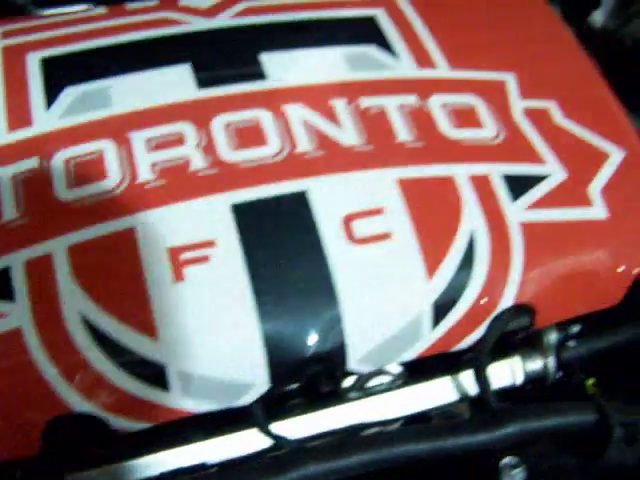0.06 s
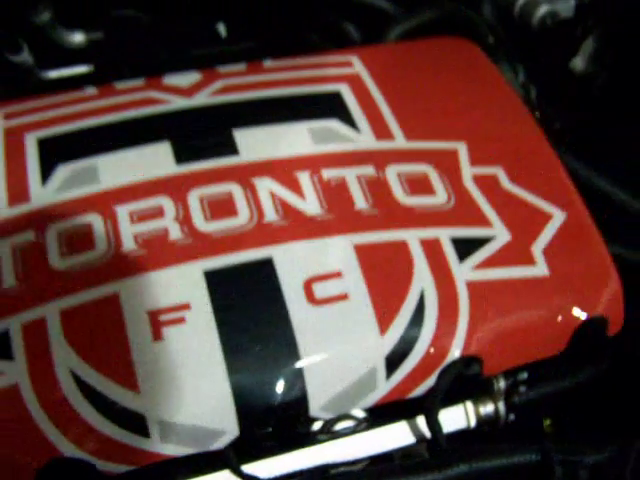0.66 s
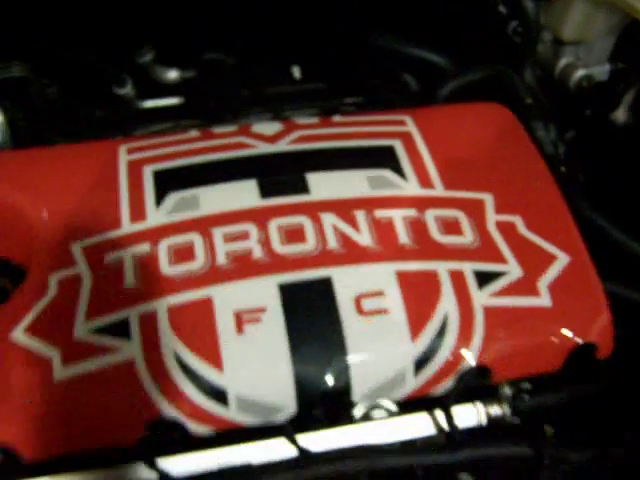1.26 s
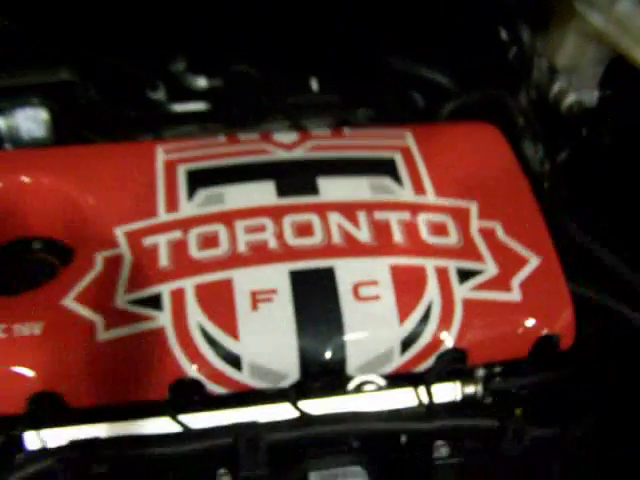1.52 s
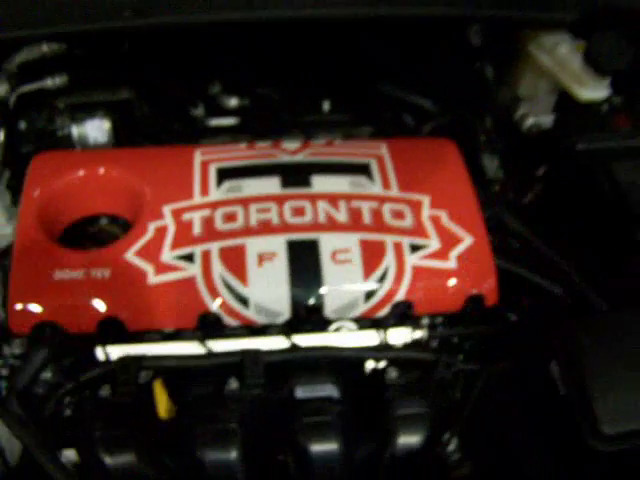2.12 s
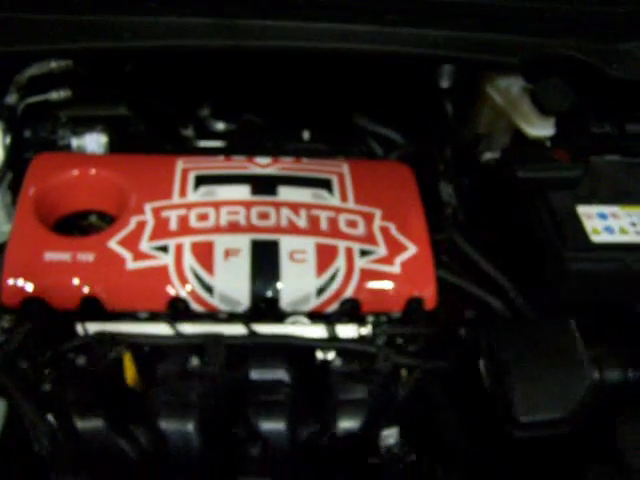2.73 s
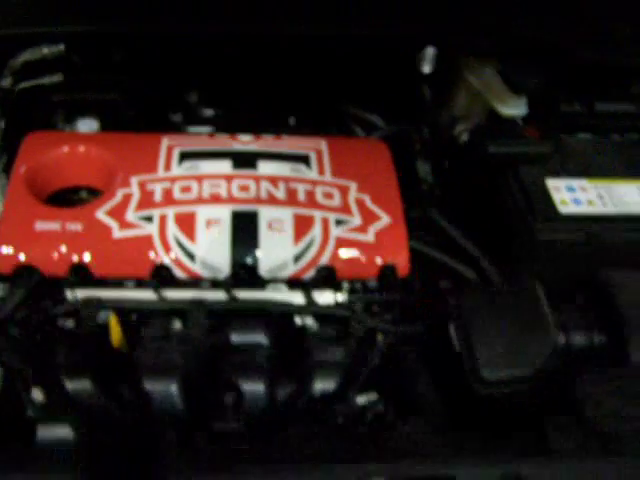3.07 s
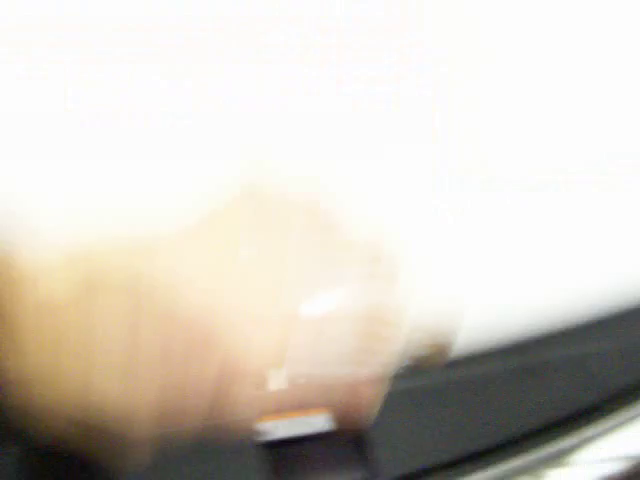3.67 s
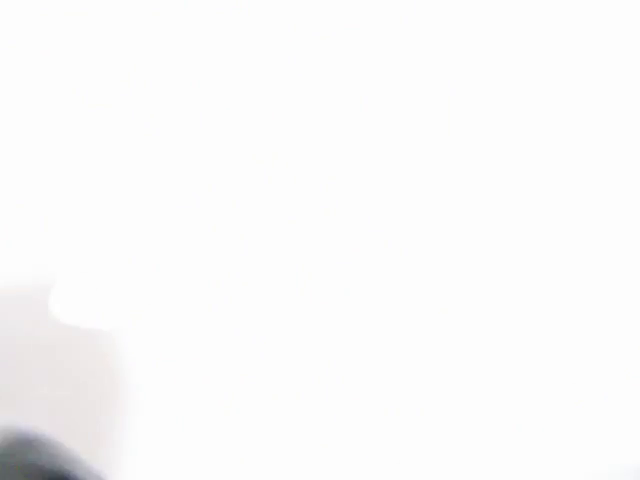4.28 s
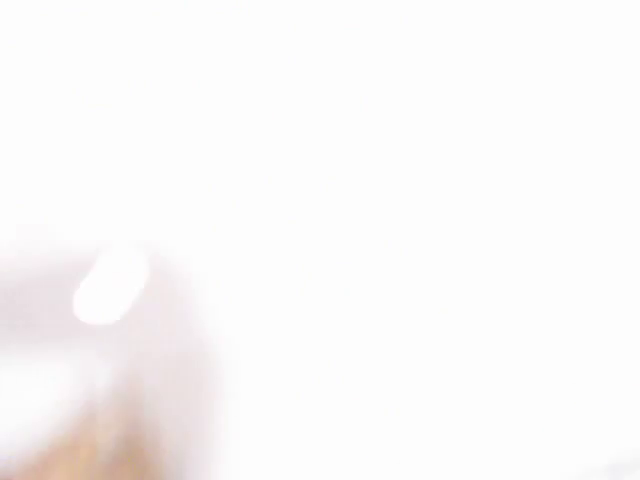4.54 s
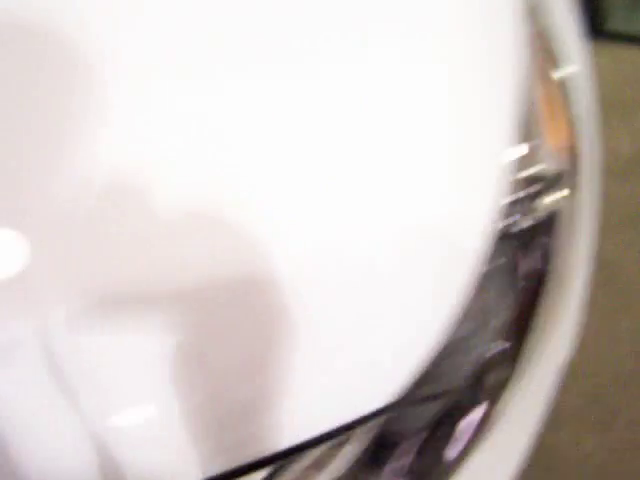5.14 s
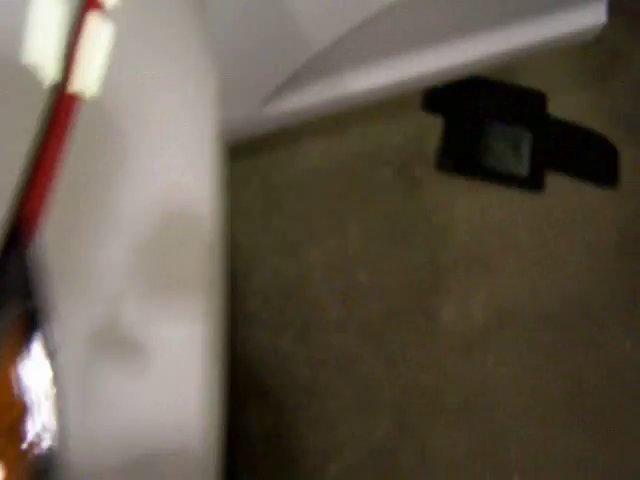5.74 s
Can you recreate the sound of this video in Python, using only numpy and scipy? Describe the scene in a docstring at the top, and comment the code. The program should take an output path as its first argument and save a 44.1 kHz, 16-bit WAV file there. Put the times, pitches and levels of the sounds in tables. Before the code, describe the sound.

A car engine idles in a garage with a low drone, a rush of fan and belts, and a faint lamp buzz. A sleeve rustles and the prop rod clicks. The hood drops with a loud, rattling steel bang, then is pushed shut with a second boom and a latch snap. The room rings while the idle carries on, heard through a close, slightly dull microphone that overloads on both bangs.

```python
"""Garage, lamps buzzing, car idling: engine drone and rumble, rush of fan and belts.
A sleeve rustles and the prop rod clicks as the hood is lowered. The hood drops onto its catch and
rattles, steel clacking and panel booming; it is pushed shut, the latch snaps, the garage rings on.
A small microphone moves from over the engine to beside the wing; it is dull above 8 kHz and
overloads on both bangs."""
import sys
import numpy as np
from scipy import signal
from scipy.fft import rfft, irfft, next_fast_len
from scipy.io import wavfile
from scipy.ndimage import map_coordinates

SR = 44100
rng = np.random.default_rng(int(sys.argv[2]) if len(sys.argv) > 2 else 0)


def wav_record(signal):
    """Record a signal, one row per channel, as 16-bit PCM in the file named by sys.argv[1]."""
    frames = np.transpose(np.atleast_2d(signal))
    bounded = np.clip(frames, -1, 1)
    # unit amplitude maps onto the largest positive 16-bit level
    quanta = np.round(bounded * 32767).astype(np.int16)
    wavfile.write(sys.argv[1], SR, quanta)


N = 257103


def hood():
    """Each contact clacks and booms; further back it is duller, longer, wetter and pings less."""
    # t/s, clack/dB, boom/dB, boom centre/Hz, depth (0 front edge, 1 hinges)
    contacts = [(3.9902, -3, -4.5, 306, 0.2), (4.014, -11.5, -17.5, 200, 0.44),
                (4.022, -15, -11, 321, 0.42), (4.070, -15.5, -11.5, 105, .05),
                (4.096, -18, -9.5, 139, 0.47), (4.154, -13, -12, 140, 0.6), (4.2878, -21, -13, 134, 0.85),
                (4.389, -25.5, -20.5, 106, 0.87), (4.779, -6.5, -8, 500, 0.16),
                (4.785, -23.5, -4.5, 197, .2), (4.876, -29, -13, 85, .05)]
    t = np.arange(SR * 3 // 4) / SR
    events = []
    for s, clack_db, boom_db, boom_hz, depth in contacts:
        clack_hz = 4300 / 2 ** (1.88 * depth)
        ping_db = -18 + 9 * np.log2(clack_hz / 3000)
        steel = clack(t, clack_hz, t60_s=0.042 * 3.85 ** depth, ping_db=ping_db)
        echo_db = -7 + 14.5 * depth
        events.append((s, amp(clack_db) * steel + amp(boom_db) * boom(t, boom_hz), echo_db))
    return in_garage(events)


def clack(t, centre_hz, t60_s, ping_db):
    """Steel strikes steel; the latch spring pings."""
    steel_spectrum = [(100, -8), (400, 4), (800, -4), (1300, -4.5), (2000, -7), (2800, -5.5), (3500, -1),
                      (4200, -6), (5000, -12.5), (7000, -17.5), (10000, -28)]  # f/Hz, relative density/dB
    spring_modes = [(2620, -14.5, 0.27), (3465, -13.5, 0.48), (3380, -13, 0.23), (3880, -18, 0.15)]  # f/Hz, relative level/dB, t60/s
    crack = unit(filtered(noise(steel_spectrum, len(t)), lambda hz: hump(hz, centre_hz, 1.83)))
    ping = amp(ping_db) * ring(spring_modes, t)
    attack = 1 - np.exp(-t / 0.00043)
    return (crack * amp(-60 * t / t60_s) + ping) * attack


def boom(t, centre_hz):
    """Panel modes near centre_hz, detuned as the sheet flexes; weaker ones blur into a shudder."""
    panel_modes = [(63.5, -11.5, 0.76), (84.6, -1.5, 0.47), (108, -0.5, 0.18), (131, -7, 0.25),
                   (173.3, -0.5, .11), (216, -2.5, 0.092), (254.4, -2.5, .16), (291.7, 1, 0.1),
                   (338.4, -2, 0.13), (402.4, -6, 0.12), (475, -4.5, 0.096), (582, 3.5, 0.034),
                   (661, 2, 0.038), (809, 1, 0.12), (930, -4, 0.11), (1274, -9.5, 0.082)]  # f/Hz, relative level/dB, t60/s
    modes = np.zeros(len(t))
    for hz, db, t60_s in panel_modes:
        flexed_hz = hz * (1 + rng.normal(0, 0.023))
        modes += hump(hz, centre_hz, 0.56) * ring([(flexed_hz, db, t60_s)], t)
    modes /= np.sqrt(np.mean(modes[:SR // 50] ** 2))  # rms 1 over the first 20 ms
    blur = filtered(rng.standard_normal(len(t)), lambda hz: hump(hz, centre_hz, 0.83) ** 2)
    shudder = unit(blur) * amp(-60 * t / 0.11)
    rise_cycles = 0.3
    attack = 1 - np.exp(-t * centre_hz / rise_cycles)
    return (amp(-6) * modes + amp(-7.5) * shudder) * attack


def closing():
    """The shut engine bay rumbles in its resonances, then the latch snaps home."""
    bay_resonances = [(38, 0.33, -5), (73.7, 0.39, 0), (117, .25, -3.5), (247, 0.22, -2)]  # f/Hz, width/octaves, relative level/dB
    shut_s, snap_s, bay_t60_s = 4.79, 4.9383, 1.1
    t = np.arange(SR) / SR
    air = unit(filtered(rng.standard_normal(len(t)), lambda hz: resonant(hz, bay_resonances)))
    rumble = air * amp(-19 - 60 * t / bay_t60_s)
    snap = amp(-11) * clack(t, centre_hz=5500, t60_s=0.062, ping_db=-6)
    return in_garage([(shut_s, rumble, -12), (snap_s, snap, -1.5)])


def gust():
    """Air squeezed from under the hood: a soft pressure swing at the microphone."""
    puffs = [(4.791, .026, 62, -18)]  # t/s, sigma/s, f/Hz, level/dB
    t = np.arange(N) / SR
    return sum(amp(db) * swell(s, sigma_s) * np.sin(2 * np.pi * hz * (t - s))
               for s, sigma_s, hz, db in puffs)


def handling():
    """The prop rod knocks as it is stowed; hand and latch click."""
    rod_knocks = [(3.163, -14.5, 0.04), (3.2746, -18, 0.006)]  # t/s, peak/dB, t60/s
    rod_resonances = [(307, 0.2, 10.5), (1937, 0.27, -1), (4100, 0.6, -7.5)]  # f/Hz, width/octaves, relative level/dB
    small_clicks = [(2.2328, -19.5, 3970, .005), (3.304, -8.5, 3420, 0.0062), (3.983, -16, 2900, .015),
                    (4.732, -21, 2930, 0.037), (4.751, -12.5, 3450, .05), (5.365, -19.5, 720, 0.048)]  # t/s, peak/dB, f/Hz, t60/s
    echo_db = -9.5
    events = [(s, click(rod_resonances, db, t60_s), echo_db) for s, db, t60_s in rod_knocks]
    for s, db, hz, t60_s in small_clicks:
        width_octaves = 0.41 * np.sqrt(3500 / hz)
        events.append((s, click([(hz, width_octaves, 0)], db, t60_s), echo_db))
    return in_garage(events)


def click(resonances, peak_db, t60_s):
    """A short burst through a small body's resonances."""
    t = np.arange(SR // 8) / SR
    grain = filtered(rng.standard_normal(len(t)), lambda hz: resonant(hz, resonances))
    burst = grain * amp(-60 * t / t60_s) * (1 - np.exp(-t / 0.0004))
    return amp(peak_db) * burst / abs(burst).max()


def sleeve():
    """Cloth slides in strokes made of small catches, over a faint hiss."""
    strokes = [(3.063, 0.41, -39.5), (3.532, 0.2, -32.5), (3.958, .015, -34), (4.3, 0.46, -37),
               (5.03, 0.06, -36), (5.214, 0.042, -33), (5.402, 0.12, -34.5), (5.706, 0.094, -38)]  # t/s, sigma/s, level/dB
    cloth_spectrum = [(300, -9.5), (1000, -16.5), (2000, -12.5), (3000, -7), (3800, -3), (4600, -9.5),
                      (6000, -16), (7500, -26), (10000, -22)]  # f/Hz, relative density/dB
    rest_db = -46.5
    power = amp(rest_db) ** 2 + sum((amp(db) * swell(s, sigma_s)) ** 2 for s, sigma_s, db in strokes)
    catches = amp(0.34 * wobble(25) + 1.1 * wobble(400))
    return np.sqrt(power) * catches * noise(cloth_spectrum, N)


def engine():
    """Idle drone with overtones, a rumble, and fan and belt rush throbbing with the drone."""
    orders = [(1, -38.5, -42.5, -52), (2, -46, -48.5, -43.5), (3, -59, -57, -48.5), (4, -63.5, -61.5, -58),
              (5, -78, -52.5, -62), (7, -59, -58, -65.5), (10, -61, -58.5, -60.5)]  # drone multiple, level/dB at places 0, 1, 2
    rush_levels_db = [-42, -41, -40]  # level/dB at places 0, 1, 2
    rush_spectrum = [(200, -32.5), (400, -4.5), (550, -2), (750, -4), (1070, -4), (1400, -8), (2600, -8.5),
                     (3700, -8), (4500, -18), (5400, -17.5), (6000, -31.5), (7400, -30.5), (8200, -49),
                     (10000, -57)]  # f/Hz, relative density/dB
    rumble_spectrum = [(15, -23), (30, 1), (45, -1.5), (60, 2.5), (90, 0.5), (130, 4), (175, 2.5),
                       (260, -0.5), (450, -5.5), (700, -31)]  # f/Hz, relative density/dB
    drone_hz = 75.3
    turns = np.cumsum(drone_hz * (1 + 0.0015 * wobble(4.19))) / SR
    drone = sum(at_place(levels_db) * tone(round(k) * turns, waver_db=min(0.47 * k, 2.2))
                for k, *levels_db in orders)
    throb = 1 + 0.069 * np.sin(2 * np.pi * turns)
    rush = at_place(rush_levels_db) * amp(0.88 * wobble(13)) * throb * noise(rush_spectrum, N)
    rumble = amp(-44 + 0.53 * wobble(4.8)) * noise(rumble_spectrum, N)
    return drone + rush + rumble


def lamps():
    """Lamps hum in low mains harmonics and sizzle in high ones."""
    harmonics = [(1, -55, -56.5, -50.5), (2, -45, -43.5, -46.5), (4, -62, -49, -54.5), (6, -54, -45, -52.5),
                 (80, -66, -67.5, -76)]  # mains multiple, level/dB at places 0, 1, 2
    mains_hz = 60
    t = np.arange(N) / SR
    buzz = sum(at_place(levels_db) * tone(round(k) * mains_hz * t, waver_db=0.9)
               for k, *levels_db in harmonics)
    sizzle = np.zeros(N)
    for hz in 2 * mains_hz * np.arange(38, 52):
        gain = amp(rng.normal(0, 2.8)) * hump(hz, 5300, 0.3)
        sizzle += gain * np.sin(2 * np.pi * (hz * t + rng.random()))
    return buzz + at_place([-57, -59.5, -64]) * unit(sizzle)


def whines():
    """Thin tones wavering in phase and level."""
    partials = [(801, -60.5, -56.5, -55), (914, -64, -58.5, -64), (981, -70, -55.5, -59.5),
                (1043, -58, -50, -55)]  # f/Hz, level/dB at places 0, 1, 2
    t = np.arange(N) / SR
    return sum(at_place(levels_db) * tone(hz * t + 0.078 * wobble(14), waver_db=1.5)
               for hz, *levels_db in partials)


def garage(x):
    """A fresh diffuse echo of x; the treble dies first."""
    decay_times = [(60, 2.16), (250, 1.24), (1000, 1.78), (3000, 1.92), (5000, 0.55), (8000, 0.16)]  # f/Hz, t60/s
    wall_reflection = [(50, -9.5), (300, 2), (1200, -0.5), (3000, -4.5), (5000, -11.5), (8000, -9.5)]  # f/Hz, relative level/dB
    hz, t, grains = signal.stft(rng.standard_normal(int(1.5 * SR)), SR, nperseg=512)
    fade = amp(along(wall_reflection, hz)[:, None] - 60 * t / along(decay_times, hz)[:, None])
    build_up = 1 - np.exp(-t / 0.0075)
    tail = signal.istft(grains * fade * build_up, SR, nperseg=512)[1]
    mids = abs(rfft(tail, 2 * SR))[200:6000]  # 100-3000 Hz
    return signal.fftconvolve(x, tail / np.sqrt(np.mean(mids ** 2)))


def in_garage(events):
    """Track of (t/s, sound, echo/dB) events, each with its own echo."""
    track = np.zeros(N)
    for s, sound, echo_db in events:
        add(track, s, sound)
        add(track, s, amp(echo_db) * garage(sound))
    return track


def at_place(levels_db):
    """A source's gain over time as the microphone moves through three places."""
    mic_path = [(0, 0), (1.2, 0.47), (2.5, 0.94), (4.0, 1.2), (5.2, 2)]  # t/s, place (0 over the engine, 1 in front of the car, 2 beside the wing)
    place = np.interp(np.arange(N) / SR, *np.transpose(mic_path))
    return amp(np.interp(place, np.arange(len(levels_db)), levels_db))


def amp(db):
    """dB to gain."""
    return 10 ** (np.asarray(db) / 20)


def unit(x):
    """Scale to rms 1."""
    return x / np.sqrt(np.mean(x ** 2) + 1e-20)


def along(points, hz):
    """Interpolate (f/Hz, value) points on a log axis."""
    knots_hz, values = np.transpose(points)
    return np.interp(np.log(hz + 1), np.log(knots_hz + 1), values)


def wobble(rate_hz):
    """Smooth random curve, rate_hz knots a second."""
    knots = rng.standard_normal(int(N * rate_hz / SR) + 4)
    return map_coordinates(knots, [np.arange(N) * rate_hz / SR])


def swell(s, sigma_s):
    """Gaussian rise and fall around time s."""
    return np.exp(-((np.arange(N) / SR - s) / sigma_s) ** 2 / 2)


def filtered(x, response):
    """Apply the gain response(f/Hz) to x."""
    size = next_fast_len(len(x) + 8192)
    return irfft(rfft(x, size) * response(np.fft.rfftfreq(size, 1 / SR)), size)[:len(x)]


def noise(spectrum, size):
    """Noise of rms 1 coloured by (f/Hz, density/dB) points."""
    return unit(filtered(rng.standard_normal(size), lambda hz: amp(along(spectrum, hz))))


def hump(hz, centre_hz, width_octaves):
    """Resonant hump on the octave axis."""
    return 1 / (1 + (np.log2((hz + 1) / centre_hz) / width_octaves) ** 2)


def resonant(hz, resonances):
    """Gain of a body with (f/Hz, width/octaves, level/dB) resonances."""
    return sum(amp(db) * hump(hz, centre_hz, octaves) ** 2 for centre_hz, octaves, db in resonances)


def tone(turns, waver_db):
    """Sine whose level wavers around rms 1."""
    return np.sqrt(2) * np.sin(2 * np.pi * (turns + rng.random())) * amp(waver_db * wobble(3.26))


def ring(modes, t):
    """Decaying sines from (f/Hz, level/dB, t60/s) rows, levels slightly random."""
    return sum(amp(db + rng.normal(0, 1) - 60 * t / t60_s) * np.sin(2 * np.pi * hz * t)
               for hz, db, t60_s in modes)


def add(track, s, sound):
    """Mix sound into track at time s."""
    part = track[round(s * SR):][:len(sound)]
    part += sound[:len(part)]


def scene():
    """Mono sum at the microphone."""
    return (engine() + lamps() + whines() + sleeve() + handling() + hood() + closing() + gust())[None]


def record(dry):
    """Dull microphone, hard overload, band limit."""
    mic_response = [(10, -26), (30, 2), (7400, -0.5), (8100, -10.5), (8700, -21.5), (9300, -65)]  # f/Hz, gain/dB
    clip_level, top_hz = 0.72, 16000
    heard = filtered(dry[0], lambda hz: amp(along(mic_response, hz)))
    clipped = np.clip(heard, -clip_level, clip_level)
    return filtered(clipped, lambda hz: hz < top_hz)[None]


dry = scene()
out = record(dry)
wav_record(out)
```